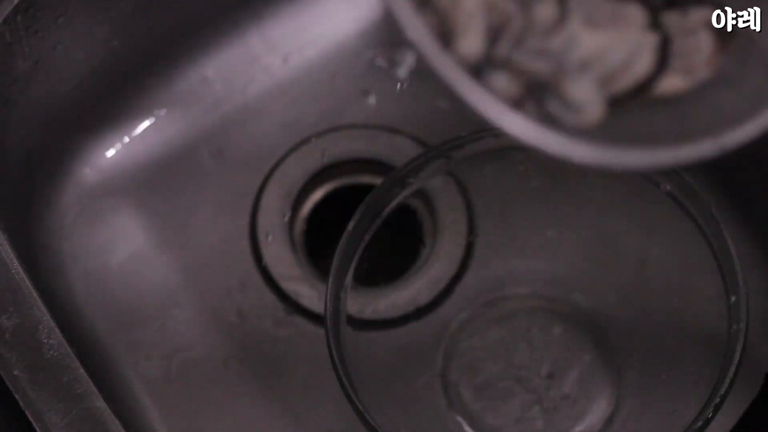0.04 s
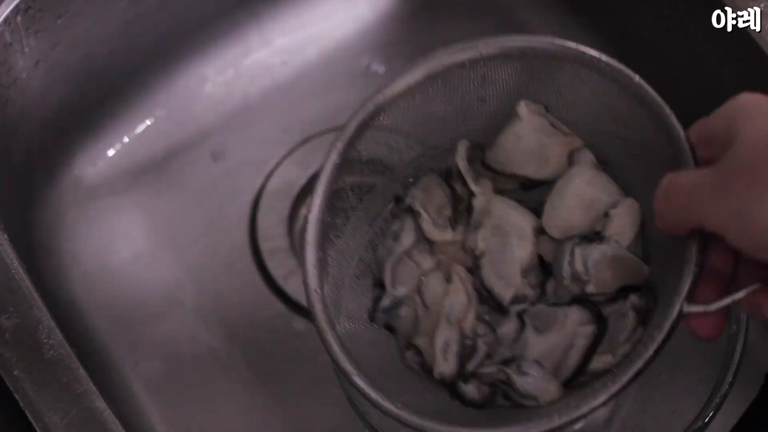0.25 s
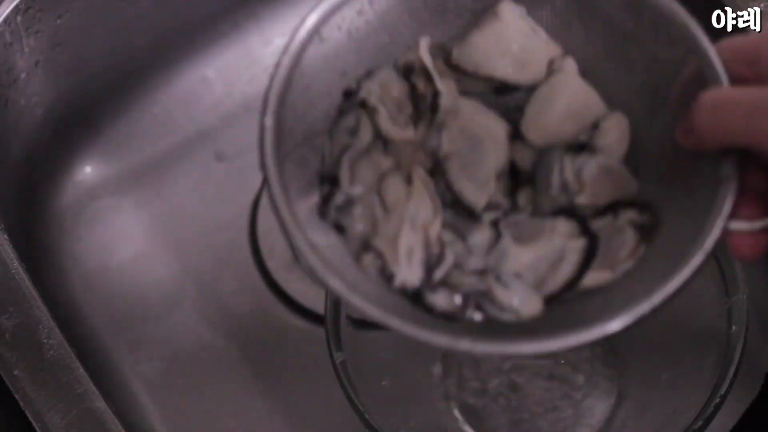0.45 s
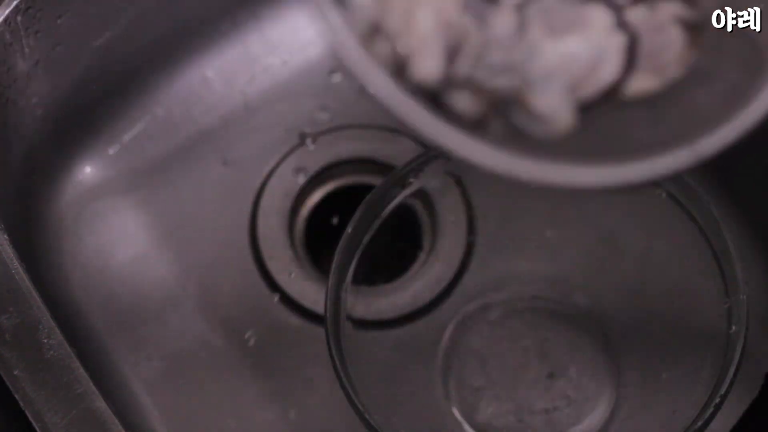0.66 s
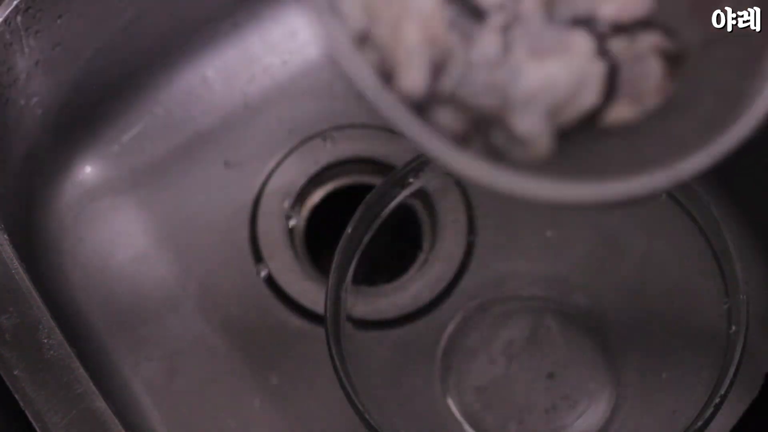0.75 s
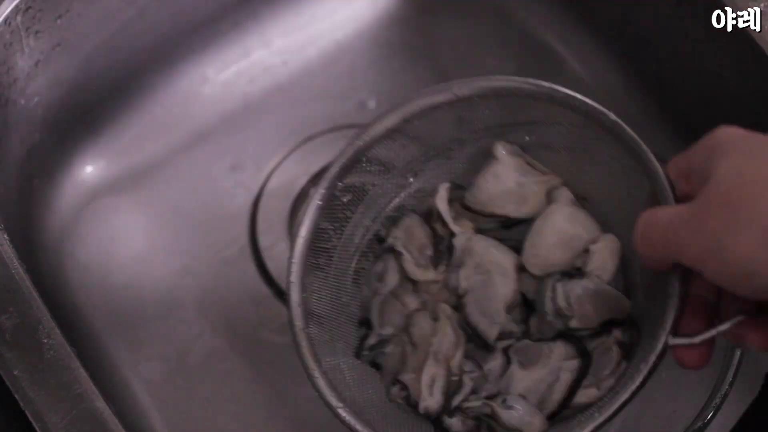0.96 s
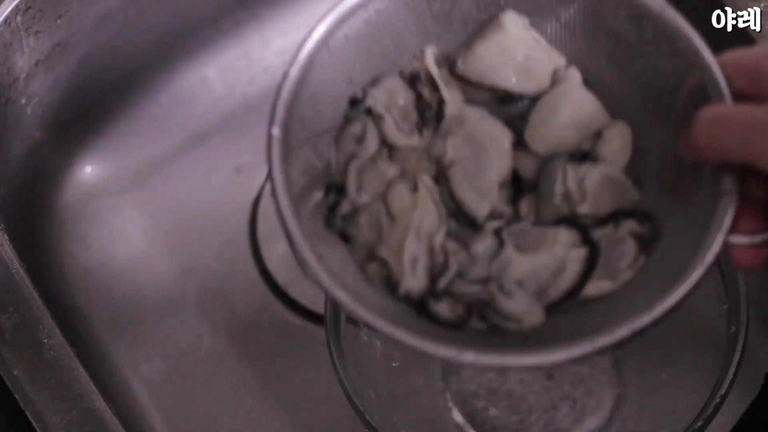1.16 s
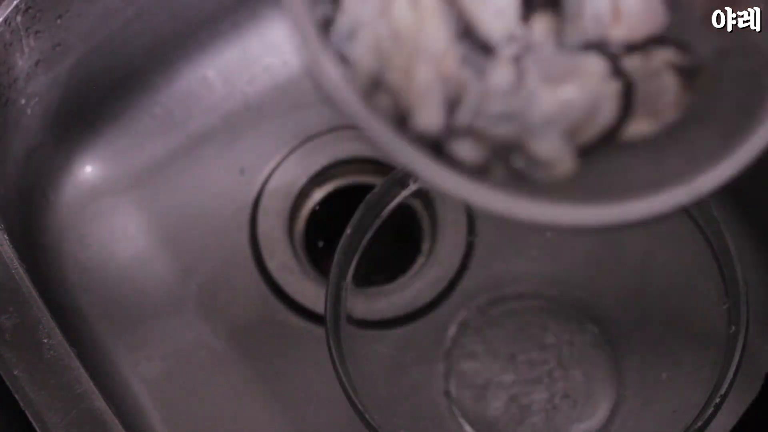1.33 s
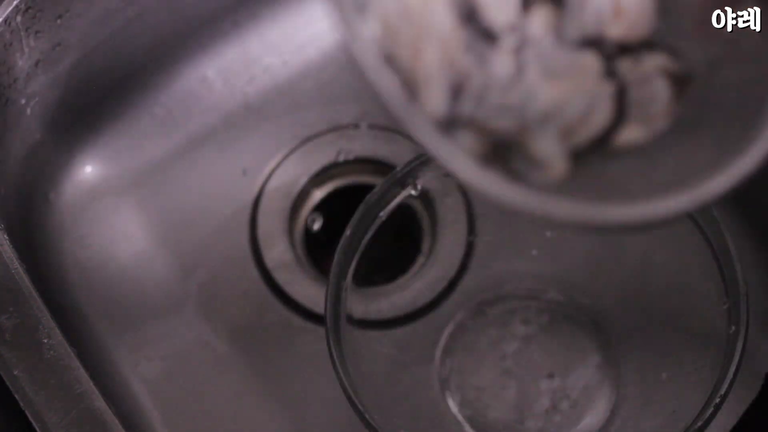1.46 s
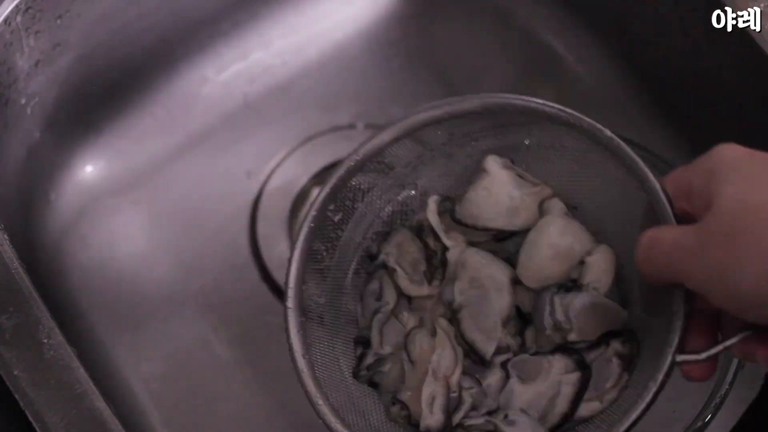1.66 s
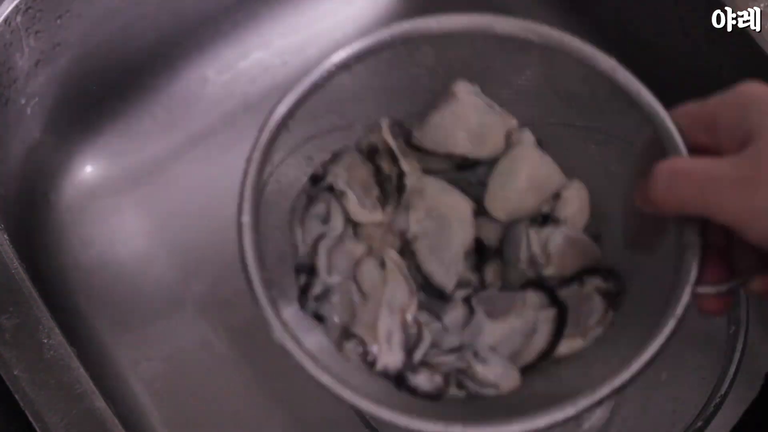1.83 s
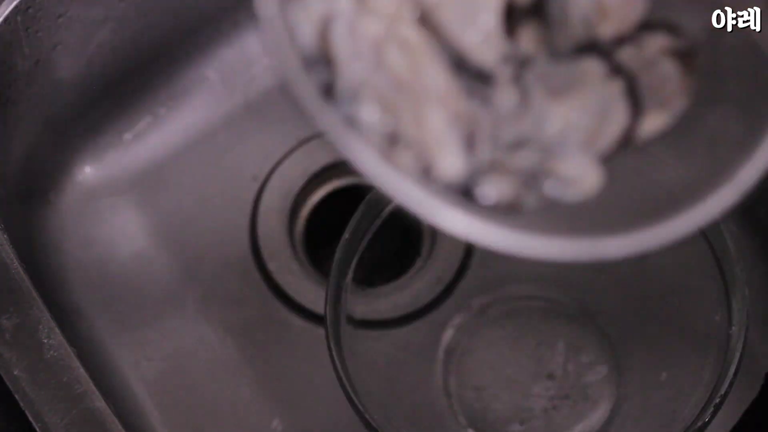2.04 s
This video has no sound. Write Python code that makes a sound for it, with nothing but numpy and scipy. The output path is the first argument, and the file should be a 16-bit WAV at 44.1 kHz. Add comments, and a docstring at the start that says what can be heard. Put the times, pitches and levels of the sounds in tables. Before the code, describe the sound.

Water drops from a shaken strainer and thuds into a glass bowl, setting the steel sink ringing. Wet oysters smack softly, then loose drips patter, plop and thin out, heard close up in a quiet kitchen.

```python
"""Slugs of water thud into a glass bowl in a steel sink as a mesh strainer of wet oysters is shaken.
Each blow sets bowl and sink ringing, and the oysters smack as they shift. Between shakes, loose drops
patter and plop and tiny bubbles tick, then all thin out; one last splash falls late.
Behind it is a quiet kitchen: short reflections, room tone and a faint rumble."""
import sys
import numpy as np
from scipy import signal
from scipy.fft import rfft, irfft
from scipy.io import wavfile

SR = 44100
rng = np.random.default_rng(int(sys.argv[2]) if len(sys.argv) > 2 else 0)


def store_wav(level_fs):
    """Save 16-bit WAV to argv[1]."""
    pcm = np.round(np.clip(np.atleast_2d(level_fs), -1, 1) * 32767)
    wavfile.write(sys.argv[1], SR, pcm.T.astype(np.int16))


N = 92610
T, HZ = np.arange(N) / SR, np.fft.rfftfreq(N, 1 / SR)


def amp(db):
    """Decibels to gain."""
    return 10 ** (np.asarray(db) / 20)


def unit(x):
    """Scales to rms 1."""
    return x / np.sqrt(np.mean(x ** 2) + 1e-20)


def read(points, hz):
    """Reads a curve on a log-frequency axis."""
    f, value = np.transpose(points)
    return np.interp(np.log(hz + 1), np.log(f + 1), value)


def fader(table, column=1):
    """Gain over time from one dB column of a table."""
    columns = np.transpose(table)
    return amp(np.interp(T, columns[0], columns[column]))


def add(mix, start, sound):
    """Mixes a sound in at a start time in seconds."""
    part = mix[max(round(start * SR), 0):][:len(sound)]
    part += sound[:len(part)]


def colour(x, eq):
    """Minimum-phase EQ of unit power, so nothing rings ahead of a hit."""
    log_gain = np.log(unit(amp(read(eq, abs(np.fft.fftfreq(N, 1 / SR))))))
    taps = np.fft.ifft(np.exp(np.conj(signal.hilbert(log_gain)))).real[:4096]
    return signal.fftconvolve(x, taps)[:N]


def noise_bed(eq):
    """Steady noise of rms 1, shaped by an EQ curve."""
    return unit(irfft(rfft(rng.standard_normal(N)) * amp(read(eq, HZ)), N))


def drops(per_s, spread_db):
    """Random impacts, mostly small, a few large."""
    size = amp(spread_db * np.minimum(rng.exponential(1, N), 4))
    return unit(size * rng.choice([-1, 1], N) * (rng.random(N) < per_s / SR))


def ring(modes):
    """Decaying modes after one blow."""
    return sum(amp(db - 60 * T / t60) * np.sin(2 * np.pi * hz * T) for hz, db, t60 in modes)


# Room tone EQ. Each row: frequency in Hz, gain in dB.
ROOM_TONE_EQ = [(15, -1), (25, -13), (64, -11.5), (110, -13), (180, -11.5), (290, -10.5), (400, -17),
                (800, -16.5), (2000, -32.5), (4500, -22), (10000, -22.5), (16000, -26.5)]

def room_tone(tone_db=-53.5, hiss_db=-54):
    """The quiet kitchen, with separate steady hiss in each channel."""
    tone = amp(tone_db) * noise_bed(ROOM_TONE_EQ)
    return tone + amp(hiss_db) * np.sqrt(2) * rng.standard_normal((2, N))


# Rumble fader. Each row: time in seconds, level in dB.
RUMBLE_LEVELS = [(0, -45), (0.06, -57), (0.15, -47), (0.9, -75), (1.5, -51), (1.9, -66), (2.0, -50),
                 (2.1, -56)]
# Rumble EQ. Each row: frequency in Hz, gain in dB.
RUMBLE_EQ = [(20, -21), (45, -9), (65, -11), (110, -11), (200, -32), (600, -63)]

def rumble():
    """A faint low rumble that comes and goes."""
    return fader(RUMBLE_LEVELS) * noise_bed(RUMBLE_EQ)


# Reverb length. Each row: frequency in Hz, seconds to fall 60 dB.
REVERB_TIMES = [(100, 0.17), (500, 0.31), (2000, 0.54), (6000, 0.13), (15000, 0.35)]

def kitchen_reverb(send):
    """Dense reflections from the sink walls and the room, hanging longest near 2 kHz."""
    hz, t, noise = signal.stft(rng.standard_normal(SR // 2), SR, nperseg=256)
    t60 = np.maximum(read(REVERB_TIMES, hz), .02)[:, None]
    tail = signal.istft(noise * amp(-60 * t / t60) / np.sqrt(t60), SR, nperseg=256)[1]
    tail = tail * (T[:len(tail)] > .003)  # pre-delay
    return signal.fftconvolve(send, tail / np.linalg.norm(tail))[:N]


# Modes of the sink floor. Each row: pitch in Hz, level in dB, seconds to fall 60 dB.
SINK_MODES = [(144.7, -20, 0.23), (201, -30, 0.2), (237, -30, .2), (261, -9.5, 0.13), (288.5, -23, 0.44),
              (350.7, -17, 0.18), (422, -52, 0.12), (586, -58, 0.1), (742.6, -31, 0.14), (819, -36, 0.32)]

def sink_ring():
    """The steel floor answers a blow with a low ring."""
    return ring(SINK_MODES)


# Spray EQ. Each row: frequency in Hz, gain in dB.
SPRAY_EQ = [(300, -50), (1200, 3.5), (2000, 3), (3200, -2), (5000, -2), (6800, -7), (9000, -6),
            (12000, -25), (16000, -17)]

def spray(impacts):
    """Fine droplets land as a bright fizz."""
    return colour(impacts, SPRAY_EQ)


# Patter faders. Each row: time in seconds, body level in dB, treble level in dB.
PATTER_LEVELS = [(0, -33, -42.5), (0.19, -32, -42.5), (0.29, -24, -41.5), (0.36, -27, -39),
                 (0.43, -38.5, -42), (0.58, -42.5, -48.5), (0.68, -37, -43.5), (0.8, -30.5, -41.5),
                 (0.86, -38.5, -45.5), (0.93, -38.5, -45.5), (1.01, -42, -43.5), (1.13, -41.5, -46),
                 (1.3, -44, -50.5), (1.45, -47, -52.5), (1.58, -57.5, -53.5), (1.68, -45.5, -49.5),
                 (1.85, -51, -54.5), (2.1, -54.5, -56)]
# Tone of drops drumming on the bowl. Each row: frequency in Hz, gain in dB.
DRUM_EQ = [(50, -38), (100, -14), (143, -8), (200, -14), (283, 0), (345, -6), (470, 1), (580, -4.5),
           (740, -8), (900, -14.5), (1230, -11.5), (1600, -26), (4000, -35.5)]
# Ring of the sink under the drops. Each row: time in seconds, level in dB.
SINK_HUM_LEVELS = [(0, -53), (0.55, -37), (0.75, -53), (0.86, -41.5), (1.0, -36), (1.12, -44), (1.3, -57.5),
                   (2.1, -64)]

def patter(body_db=-1.5, fizz_db=-3.5):
    """Loose drops drum on the bowl, throw off fine spray and keep the sink ringing."""
    body = colour(drops(per_s=600, spread_db=3) * fader(PATTER_LEVELS), DRUM_EQ)
    fizz = spray(drops(per_s=2500, spread_db=2) * fader(PATTER_LEVELS, column=2))
    on_sink = drops(per_s=600, spread_db=3) * fader(SINK_HUM_LEVELS)
    sink = sink_ring()
    hum = signal.fftconvolve(on_sink, sink / np.linalg.norm(sink))[:N]
    return amp(body_db) * body + amp(fizz_db) * fizz + hum


def ping(t, hz, decay, attack_s=.0022, glide_per_s=.35):
    """A tone rings briefly, rising a little in pitch."""
    envelope = (1 - np.exp(-t / attack_s)) * np.exp(-t / decay)
    return envelope * np.sin(2 * np.pi * hz * t * (1 + glide_per_s * t / 2))


def ticks(per_s=130, pitches=32, decay_cycles=16, trim_db=-7):
    """Tiny bubbles burst in the mesh and the puddle, riding the patter's treble fader."""
    out, t = np.zeros(N), T[:SR // 16]
    for hz in np.geomspace(1406.5, 7864, pitches) * rng.uniform(0.96, 1.05, pitches):
        size = amp(-np.minimum(rng.exponential(1, N), 4))
        bursts = rng.random(N) < per_s / pitches / SR
        out += signal.oaconvolve(size * bursts, ping(t, hz, decay_cycles / hz))[:N]
    return amp(trim_db) * unit(out) * fader(PATTER_LEVELS, column=2)


# Plops and short rings. Each row: start in seconds, level in dB, pitch in Hz, decay in seconds.
PLOP_AND_RING_CUES = [(0.05, -27.5, 489.6, 0.033), (0.072, -13.5, 765, 0.004), (0.074, -33.5, 963, 0.06),
                      (0.107, -19.5, 490, 0.0073), (0.281, -19, 716, 0.014), (0.300, -15, 811, 0.015),
                      (0.594, -17, 712, 0.0069), (0.595, -54, 816, .012), (0.597, -31, 1167, .02),
                      (0.609, -23, 1236, 0.017), (0.688, -26, 593, 0.016), (0.724, -33, 295, 0.013),
                      (0.66, -32, 137.4, 0.053), (0.948, -25.5, 138.8, 0.052), (0.52, -22.5, 285.2, 0.061),
                      (0.919, -23, 249.5, 0.032), (1.02, -20.5, 285.7, 0.052), (0.787, -23.5, 493, 0.015),
                      (0.881, -25.5, 746, 0.021), (0.879, -42, 86, 0.031), (0.937, -23.5, 448, 0.035),
                      (0.968, -21.5, 573.5, 0.029), (0.985, -21.5, 434, 0.022), (1.034, -28.5, 584, 0.046),
                      (1.089, -23, 1397, 0.0087), (1.089, -21.5, 1174, 0.0087), (1.095, -22.5, 152, 0.032),
                      (1.136, -16, 479, 0.0049), (1.186, -26, 487, .011), (1.195, -43, 1620, 0.033),
                      (1.233, -22.5, 565.5, 0.01), (1.276, -31.5, 531.5, 0.025),
                      (1.593, -35.5, 83.5, 0.036), (1.6, -32, 725, 0.036), (1.651, -34, 543, 0.023),
                      (1.801, -37.5, 270.5, 0.037)]

def plops_and_rings():
    """Hollow plops, with short rings of the bowl and the sink."""
    out, t = np.zeros(N), T[:SR // 4]
    for start, db, hz, decay in PLOP_AND_RING_CUES:
        add(out, start, amp(db) * ping(t, hz, decay))
    return out


# Smack cues. Each row: start in seconds, level in dB, centre in Hz, width in Hz, decay in seconds.
SMACK_CUES = [(0.079, -36.5, 9100, 890, 0.01), (0.114, -35.5, 4190, 1500, 0.0038),
              (0.171, -42, 5720, 400, 0.0083), (0.208, -45, 7950, 5960, 0.0048),
              (0.298, -26, 8270, 3000, 0.0042), (0.299, -30.5, 6320, 1210, 0.023),
              (0.312, -28, 8550, 1500, 0.0096), (0.325, -29, 3556, 1490, .018),
              (0.328, -37.5, 9030, 900, 0.033), (0.3557, -18, 11060, 4000, 0.0059),
              (0.355, -27.5, 5340, 2000, 0.0094), (0.369, -28.5, 10930, 2500, 0.01),
              (0.3925, -20.5, 8600, 2040, 0.0037), (0.394, -35, 12500, 4000, 0.0088),
              (0.627, -37.5, 7200, 500, 0.0073), (0.846, -46, 5600, 494, 0.025),
              (0.916, -40, 4120, 1020, .025), (1.032, -27.5, 8780, 1810, 0.0037),
              (1.0322, -47, 12100, 4000, 0.015), (1.059, -29, 14500, 1800, 0.0033),
              (1.07, -28.5, 8780, 1190, 0.0041), (1.069, -36, 12860, 3000, .005),
              (1.078, -32, 4840, 453, 0.011), (1.089, -40, 3225, 400, 0.014),
              (1.2057, -43, 9600, 960, .008), (1.325, -44, 5270, 607, 0.0058),
              (1.5954, -17.5, 5460, 700, 0.00092), (1.649, -38, 2217, 1530, 0.018),
              (0.337, -33, 2236, 500, 0.011), (0.4963, -40.5, 5960, 900, 0.0069),
              (1.706, -34, 12840, 1800, 0.005), (1.7379, -37, 14500, 1190, .006)]

def smacks(attack_s=.001):
    """Wet films on the oysters snap, each crackling through one small, high resonance."""
    out, t = np.zeros(N), T[:SR // 8]
    for start, db, hz, width, decay in SMACK_CUES:
        real, imag = rng.standard_normal((2, len(t)))
        crackle = signal.lfilter(*signal.butter(2, min(width / 2, SR / 4), fs=SR), real + 1j * imag)
        crackle = crackle / np.sqrt(abs(crackle) + 1e-9)  # soften the peaks
        band = unit((crackle * np.exp(2j * np.pi * hz * t)).real)
        envelope = np.minimum(t / attack_s, 1) * np.exp(-t / decay)
        add(out, start, amp(db) * envelope * band)
    return out


# Splash cues. Each row: start in seconds, level in dB, decay in seconds, spray in dB against the slap.
SPLASH_CUES = [(0.072, -31.5, 0.0052, -4), (0.105, -20, 0.01, -21), (0.196, -23, 0.026, -13),
               (0.209, -25, 0.037, -22), (0.595, -22, 0.011, -22), (0.778, -25, 0.013, -15.5),
               (0.878, -25.5, 0.019, -7.5), (1.086, -21, 0.011, -15.5), (1.367, -39, 0.02, -10),
               (1.591, -24.5, 0.022, -9), (1.648, -30.5, 0.018, -19), (1.796, -39.5, 0.018, -16),
               (2.087, -36, 0.034, -10)]
# Slap EQ. Each row: frequency in Hz, gain in dB.
SLAP_EQ = [(40, -36), (90, 10.5), (200, -13.5), (290, -10), (360, -2.5), (500, 1.5), (760, -6), (900, -10),
           (1150, -13), (1600, -22), (3000, -48), (8000, -40)]

def splashes(attack_s=.0039):
    """A clump of drops lands at once: a hollow slap with spray above it."""
    slap_gain, spray_gain = np.zeros((2, N))
    for start, db, decay, spray_db in SPLASH_CUES:
        envelope = amp(db) * np.minimum(T / attack_s, 1) * np.exp(-T / decay)
        add(slap_gain, start, envelope)
        add(spray_gain, start, envelope * amp(spray_db))
    slap = colour(slap_gain * drops(per_s=4000, spread_db=-1.5), SLAP_EQ)
    return slap + spray(spray_gain * drops(per_s=5000, spread_db=-1.5))


# Modes of the bowl. Each row: pitch in Hz, level in dB, seconds to fall 60 dB.
BOWL_MODES = [(1107, -24, 0.11), (1162, -38.5, 0.25), (1219, -21.5, 0.092), (1319, -36, 0.44),
              (1435, -38, 0.18), (2280, -45.5, 0.23)]

def bowl_ring(attack_s=.0017):
    """The glass answers a blow of water with a soft-edged chime."""
    return ring(BOWL_MODES) * (1 - np.exp(-T / attack_s))


# Heavy blows of water. Each row: start in seconds, level in dB, pitch in Hz, send to the bowl in dB.
THUD_CUES = [(0.1646, -19.5, 218, 8), (0.1742, -20, 240, -14), (0.2118, -8.5, 276, 12),
             (0.2224, -8.5, 325, 16.5), (0.2290, 3.5, 256, 7), (0.2400, 5, 280, 2.5), (0.2542, 2, 254, -21),
             (0.2626, -1.5, 308, -23), (0.2826, -16, 303, 3), (0.3002, -6.5, 308, 4.5),
             (0.4545, -10, 232, -2.5), (0.5000, -10.5, 234, 2.5), (0.5133, -17.5, 252, -5),
             (0.967, -22.5, 310, -35), (0.988, -17.5, 284, -25), (1.0867, -14, 265, -3),
             (1.0935, -16, 270, -5), (1.1004, -24, 170, -12)]

def thuds(peak_s=.004, pitch_sag=.14, low_cut_hz=114):
    """Each slug of water gives a short low push and sets the sink and the bowl ringing."""
    push, on_sink, on_bowl = np.zeros((3, N))
    t = T[:SR // 20]
    age = t / peak_s
    envelope = (age * np.exp(1 - age)) ** 3
    for start, db, hz, bowl_db in THUD_CUES:
        cycles = hz * (t - peak_s) * (1 - pitch_sag * (1 - np.exp(-age)))
        add(push, start, amp(db) * envelope * np.cos(2 * np.pi * cycles))
        add(on_sink, start + peak_s * 0.757, amp([db]))
        add(on_bowl, start + peak_s / 2, amp([db + bowl_db]))
    sink = signal.fftconvolve(on_sink, sink_ring())[:N]
    bowl = signal.fftconvolve(on_bowl, bowl_ring())[:N]
    return signal.lfilter(*signal.butter(3, low_cut_hz, "high", fs=SR), push + sink + bowl)


def scene():
    """Close-up water layers, each with its reverb send in dB, over the kitchen's background."""
    layers = [(thuds(), -14), (splashes(), -3), (plops_and_rings(), -8.5),
              (patter() + ticks(), -5.5), (smacks(), -8)]
    direct = sum(layer for layer, _ in layers)
    send = sum(layer * amp(send_db) for layer, send_db in layers)
    return direct + kitchen_reverb(send) + room_tone() + rumble()


# DC offset. Each row: one channel's shift as a share of full scale.
DC_OFFSET = [
    [.0094],
    [.0119],
]

def record(dry, threshold_db=-17, duck_share=.43, release_db_per_s=71.5, high_cut_hz=15900):
    """A limiter ducks after the loudest blows; then clipping, a high cut and a small offset."""
    power = signal.lfilter(*signal.butter(1, 30, fs=SR), (dry ** 2).mean(0))
    power_db = 10 * np.log10(power + 1e-12)
    release = T * release_db_per_s
    held_db = np.maximum.accumulate(power_db + release) - release
    over_db = np.maximum(held_db - threshold_db, 0)
    clipped = np.clip(dry * amp(-duck_share * over_db), -1, 1)
    high_cut = signal.firwin(401, high_cut_hz, window=("kaiser", 8), fs=SR)
    return signal.oaconvolve(clipped, high_cut[None], "same") + DC_OFFSET


dry = scene()
out = record(dry)
store_wav(out)
```